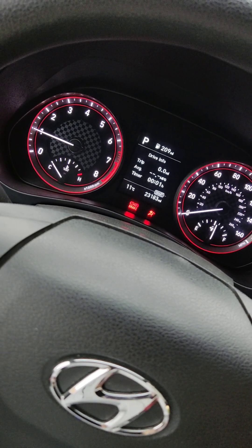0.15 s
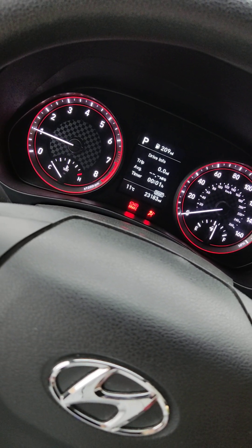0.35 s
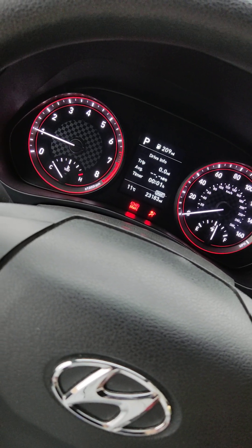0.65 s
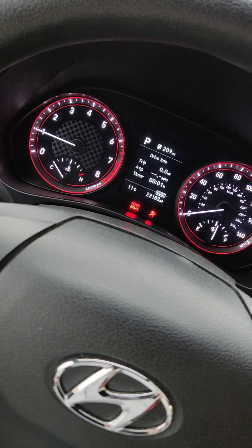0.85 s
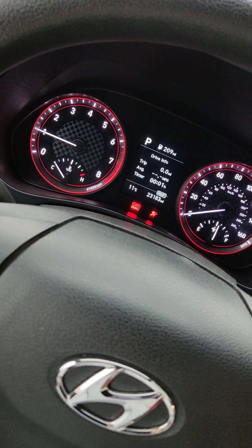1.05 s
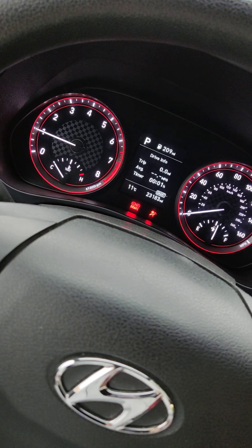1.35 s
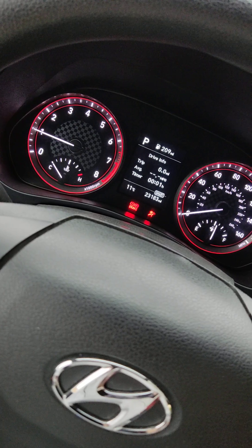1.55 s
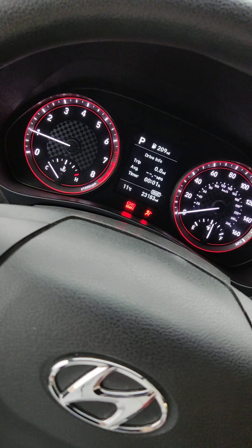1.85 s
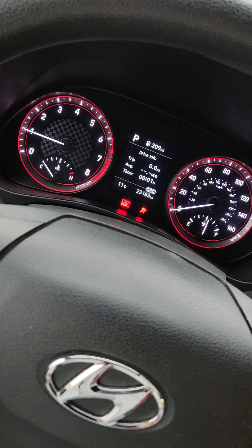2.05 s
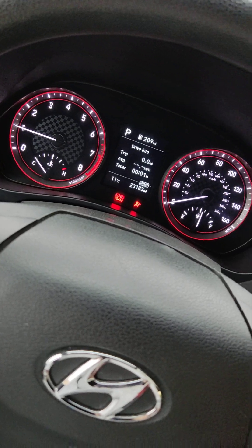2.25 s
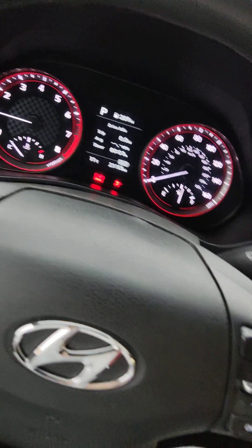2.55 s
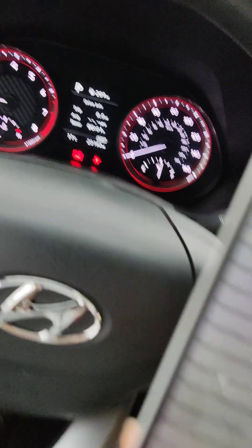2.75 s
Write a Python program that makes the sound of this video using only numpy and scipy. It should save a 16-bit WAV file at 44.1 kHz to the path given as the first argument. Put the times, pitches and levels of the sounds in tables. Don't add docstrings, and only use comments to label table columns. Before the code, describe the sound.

An idling car engine drones low and even inside the cabin, with faint air rush and ticks

```python
import sys
import numpy as np
from scipy import signal
from scipy.fft import rfft, irfft
from scipy.io import wavfile
from scipy.ndimage import uniform_filter1d

SR = 44100
rng = np.random.default_rng(int(sys.argv[2]) if len(sys.argv) > 2 else 0)


def dump(signal):
    limited = np.clip(np.atleast_2d(signal).T, -1, 1)
    pcm = np.round(limited * 32767).astype(np.int16)
    wavfile.write(sys.argv[1], SR, pcm)


def ratio_of_db(decibels):
    return 10 ** (np.asarray(decibels, float) / 20)


N = 127890


def band(x, hz, width, order=1):
    f = np.arange(N // 2 + 1) * SR / N + 1e-3
    response = 1 / (1 + 1j * (f - hz * hz / f) / width) ** order
    return irfft(rfft(x) * response, N)


def unit(x):
    return x / np.sqrt(np.mean(x ** 2))


def walk(rate):
    hold = int(SR / rate)
    steps = np.repeat(rng.standard_normal(N // hold + 1), hold)
    return 1.73 * uniform_filter1d(uniform_filter1d(steps, hold), hold)[:N]


def stereo_db(left_db, right_db):
    return ratio_of_db(np.array([[left_db], [right_db]]))


def pan(db):
    return stereo_db(db / 2, -db / 2)


def curve(t, table):
    return np.interp(t, *np.array(table).T)


# time_s, firing_hz
IDLE = [(0, 33.4), (.4, 33.32), (.8, 33.14), (1.2, 33.33), (1.45, 32.97), (1.9, 32.84), (2.35, 32.94),
        (2.9, 32.88)]


def crank():
    firing_hz = curve(np.arange(N) / SR, IDLE)
    start_turn = .057
    return 2 * np.pi * (start_turn + np.cumsum(firing_hz) / SR)


# firing_multiple, level_db (under the boom), left_minus_right_db
ENGINE_ORDERS = [(.75, -27, 1), (1, 0, 1.3), (1.5, -25, 0), (2, -14, 0), (3, -10, -.5), (4, -15, -1.8),
                 (4.5, -30, -2), (5, -30, -2), (5.5, -32, -1), (6, -36, -1)]
# time_s, level_db
BOOM = [
    (0, -35.5),
    (.8, -34.5),
    (1.6, -34.5),
    (2.9, -34),
]


def engine(t):
    pulse_lag_rad, body_turn_rad, port_lag_rad = .98, 4.3, .05
    scatter_db, jitter_rad, scatter_per_s = .65, .07, 12
    turn, out = crank(), 0
    for order, level_db, pan_db in ENGINE_ORDERS:
        if order == 1:
            lag = port_lag_rad * np.array([[0], [1]])
        else:
            lag = body_turn_rad - order * pulse_lag_rad + jitter_rad * walk(scatter_per_s)
        uneven_db = scatter_db * np.sqrt(order) / 2 * walk(scatter_per_s)
        out = out + pan(pan_db) * ratio_of_db(level_db + uneven_db) * np.cos(order * turn + lag)
    return np.sqrt(2) * ratio_of_db(curve(t, BOOM)) * out


# shaft_multiple, level_db
COMPRESSOR = [(2, -58), (3, -51.5), (4, -54), (7, -60), (8, -62), (9, -71), (10, -69), (11, -76), (12, -75),
              (16, -74)]
# time_s, slip_rad
BELT_SLIP = [(.2, .23), (.6, .04), (1.3, -.17), (1.7, -.07), (2.2, .18), (2.7, .08)]


def compressor(t):
    belt_ratio, start_turn = .6213, -.07
    mount_lag_rad, lag_per_octave_rad = .3, 1.4
    turn = 2 * np.pi * start_turn + belt_ratio * crank() + curve(t, BELT_SLIP)
    out = 0
    for k, level_db in COMPRESSOR:
        lag = mount_lag_rad + lag_per_octave_rad * np.log2(k / 3)
        level = ratio_of_db(level_db + .9 * walk(5))
        out = out + level * np.cos(k * turn - lag + .15 * walk(3))
    return np.sqrt(2) * out


# firing_multiple, level_db
PUMP = [(.432, -64), (2.273, -60), (3.38, -68), (4.546, -65)]
# time_s, gain_db
PUMP_LOAD = [
    (0, 8.5),
    (.4, -7),
    (1.8, 2),
    (2.3, 0),
    (2.9, 2),
]


def pump(t):
    turn, out = crank() - .8, 0
    for k, level_db in PUMP:
        level = ratio_of_db(level_db + 1.2 * walk(5))
        out = out + level * np.cos(k * turn + 2.2 + .3 * walk(3))
    return np.sqrt(2) * ratio_of_db(curve(t, PUMP_LOAD)) * out


# firing_multiple, left_db, right_db
GEAR_WHINE = [(11.41, -66, -62.5), (11.868, -66.5, -66), (10.952, -69, -71), (10.494, -70, -72),
              (10.02, -71, -72)]
# time_s, gain_db
KNOCK = [(0, -1), (.8, -1), (1.4, -5), (1.73, 4), (2.0, -4), (2.37, 5), (2.6, -4.5), (2.9, 5)]


def panel(t):
    knock_at_s, wander_rad, scatter_db = 2.37, .45, 1.8
    phase = crank()
    turn, out = phase - phase[int(knock_at_s * SR)], 0
    for n, (k, left_db, right_db) in enumerate(GEAR_WHINE):
        gain_db = scatter_db * walk(3.99)
        if n > 0:
            gain_db = gain_db + curve(t, KNOCK)
        line = np.cos(k * turn + wander_rad * walk(3.93))
        out = out + stereo_db(left_db, right_db) * ratio_of_db(gain_db) * line
    return np.sqrt(2) * out


# pitch_hz, level_db (per Hz)
AIR = [(6, -72), (50, -72.5), (150, -81.5), (260, -88), (500, -86), (1200, -96), (5500, -110),
       (14000, -116)]


def air():
    air_db, swell_db, flicker_db, alike_below_hz = 2, .45, .9, 264
    pitch_hz, density_db = np.array(AIR).T
    out, swell = 0, walk(5.98)
    for hz in 5.6 * 2 ** np.arange(0, 11.4, 1 / 3):
        left, other = unit(band(rng.standard_normal((2, N)), hz, hz / 3, order=2))
        share = 1 / np.sqrt(1 + (alike_below_hz / hz) ** 3)
        right = ((1 - share) * left + share * other) / np.hypot(1 - share, share)
        level_db = np.interp(np.log(hz), np.log(pitch_hz), density_db) + 10 * np.log10(hz / 4.6)
        level_db = level_db + air_db + swell_db * swell + flicker_db * walk(15)
        out = out + ratio_of_db(level_db) * np.array([left, right])
    return out


# pitch_hz, width_hz, left_db, right_db
DUCT = [(383.6, 35, -65.5, -67), (347.7, 56, -64, -70.5), (281.2, 7.8, -69, -81), (503.5, 26, -69.5, -74),
        (628, 37, -76.5, -75), (907, 190, -71.5, -70.5)]


def ducts():
    out = 0
    for hz, width, left_db, right_db in DUCT:
        a, b = unit(band(rng.standard_normal((2, N)), hz, width, order=2))
        out = out + stereo_db(left_db, right_db) * np.array([a, 0.94 * a + 0.49 * b])
    return out


# pitch_hz, width_hz, level_db
STIR = [(5, 13, -59.5), (59.4, 110, -60.5)]


def stir():
    out = 0
    for hz, width, level_db in STIR:
        noise = rng.standard_normal((2, N))
        out = out + ratio_of_db(level_db) * unit(band(noise, hz, width, order=2))
    return out


# centre_s, length_s, low_db, high_db
RUSTLES = [(0.305, 0.16, -73.5, -84), (0.735, 0.062, -75, -92), (0.418, 0.04, -68.5, -82),
           (0.259, .01, -71, -90), (1.431, .01, -69, -90), (2.269, 0.0091, -70, -90),
           (0.458, 0.015, -62.5, -84), (1.063, 0.044, -68, -73), (1.093, .03, -71.5, -86),
           (1.633, 0.0089, -67, -62.5), (1.644, 0.022, -66, -65.5), (1.757, 0.035, -69, -75),
           (1.931, 0.015, -63.5, -88), (1.957, 0.01, -63, -90), (1.993, 0.012, -70, -92),
           (2.042, 0.013, -70, -90), (2.175, 0.028, -67, -89), (2.354, 0.061, -70, -82),
           (2.543, 0.037, -68.5, -63.5), (2.642, 0.035, -69, -80), (2.842, 0.039, -64.5, -78)]
# start_s, low_db, high_db, high_pitch_hz, left_minus_right_db
TICKS = [(0.9371, -85, -44.5, 9140, -2.5), (1.157, -68, -62, 6000, -6), (1.2255, -76, -49.5, 9000, -1),
         (1.267, -85, -59, 9800, 0), (1.5654, -62.5, -54.5, 11900, 6), (1.5678, -73, -56.5, 7450, -7),
         (1.6282, -80, -52, 13000, 5), (1.6297, -70, -44, 8650, 8), (1.6315, -70, -49, 7100, -1),
         (1.6407, -78, -51, 11600, 11), (2.842, -81, -64, 7000, -7)]


def handling(t):
    low_gain_db, high_gain_db, snap_db = 7.5, 2, 5.5
    decay_s, tail_s, tail_db, tick_width_hz = .00068, .0077, -10.5, 2800
    low, high, cracks = np.zeros((2, N)), np.zeros((2, N)), 0
    low_noise, high_noise = rng.standard_normal((2, 2, N))
    grain = ratio_of_db(2.5 * walk(400))
    for centre, length, low_db, high_db in RUSTLES:
        shape = np.exp(-(2 * (t - centre) / length) ** 2) * grain
        low = low + ratio_of_db(low_db) * shape
        high = high + ratio_of_db(high_db) * shape
    for start, low_db, high_db, hz, pan_db in TICKS:
        age = np.maximum(t - start, 0)
        fade = np.exp(-age / decay_s) + ratio_of_db(tail_db) * np.exp(-age / tail_s)
        shape = (t > start) * fade * pan(pan_db)
        low = low + ratio_of_db(low_db + low_gain_db) * shape
        snap = ratio_of_db(snap_db) * (age < 1 / SR)
        crack = ratio_of_db(high_db + high_gain_db) * shape * (high_noise / 2 + snap)
        cracks = cracks + band(crack, hz, tick_width_hz, order=2)
    body = 4.69 * band(low * low_noise, 1240, 3770, order=2)
    return body + 3.0 * (cracks + band(high * high_noise, 8950, 4300, order=2))


def scene():
    t = np.arange(N) / SR
    machinery = engine(t) + compressor(t) + pump(t) + panel(t)
    return machinery + air() + ducts() + stir() + handling(t)


def band_limit(x):
    return signal.sosfilt(signal.butter(12, 15100, fs=SR, output="sos"), x)


# pitch_hz, width_hz, gain_db
PORTS = [
    (11100, 2000, 7.5),
    (8600, 1060, 12),
]


def record(dry):
    ports = []
    for x, (hz, width, gain_db) in zip(dry, PORTS):
        ports.append(x + (ratio_of_db(gain_db) - 1) * band(x, hz, width))
    top_cut = signal.ellip(8, .2, 24, 14220, fs=SR, output="sos")
    mix = signal.sosfilt(top_cut, np.array(ports))
    return band_limit(mix)


dry = scene()
out = record(dry)
dump(out)
```